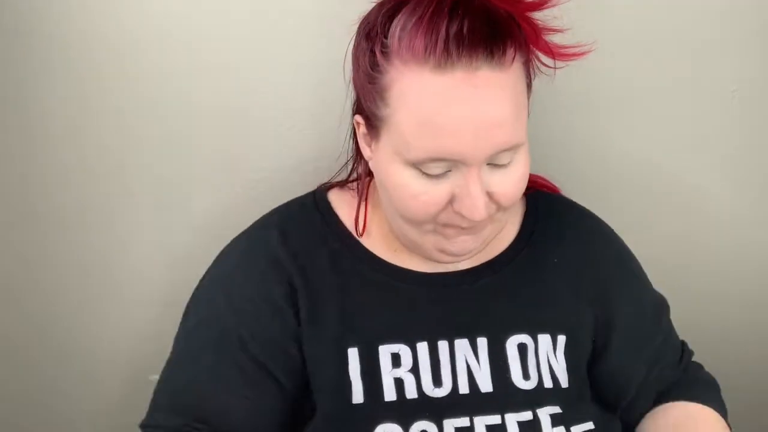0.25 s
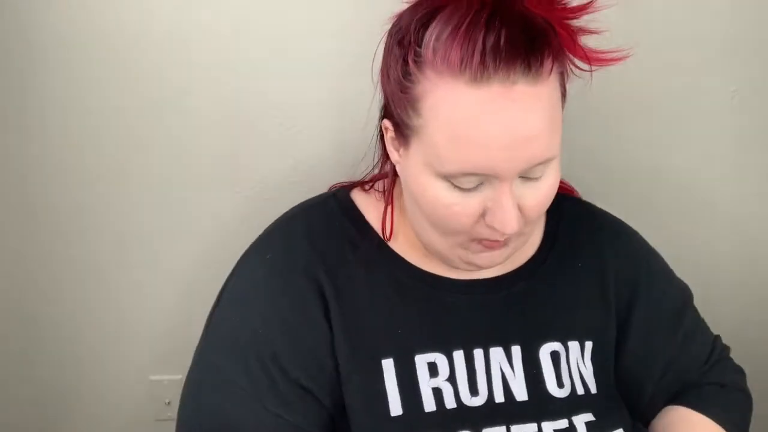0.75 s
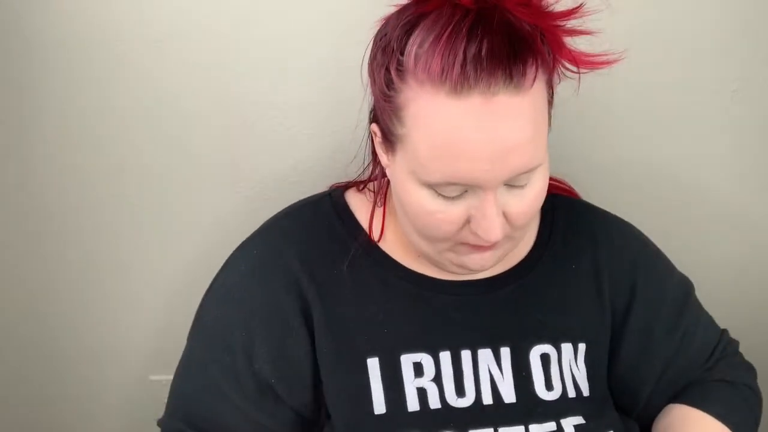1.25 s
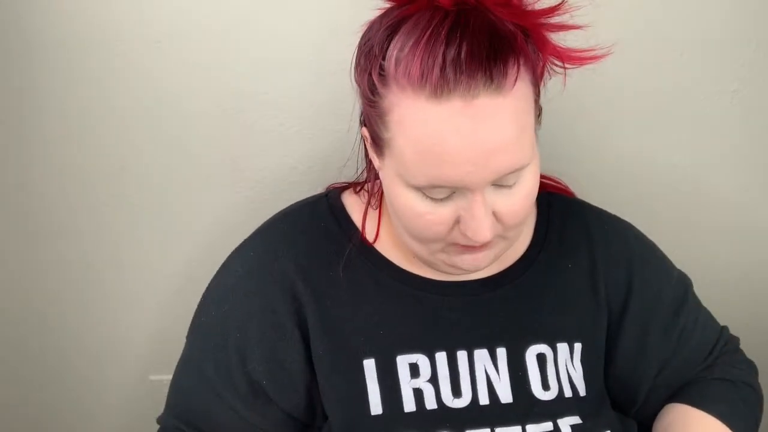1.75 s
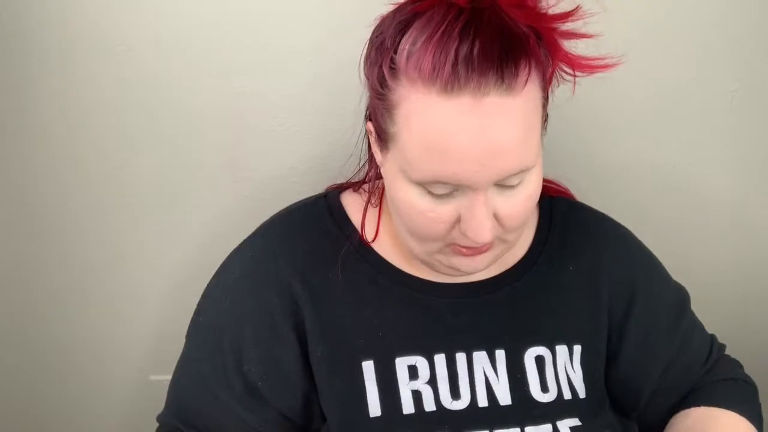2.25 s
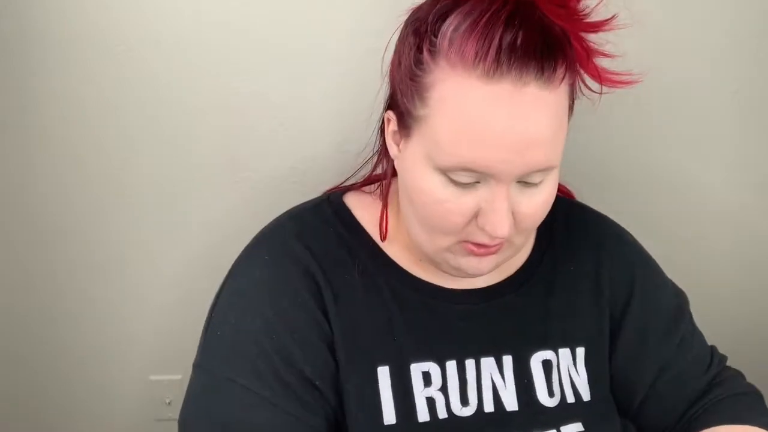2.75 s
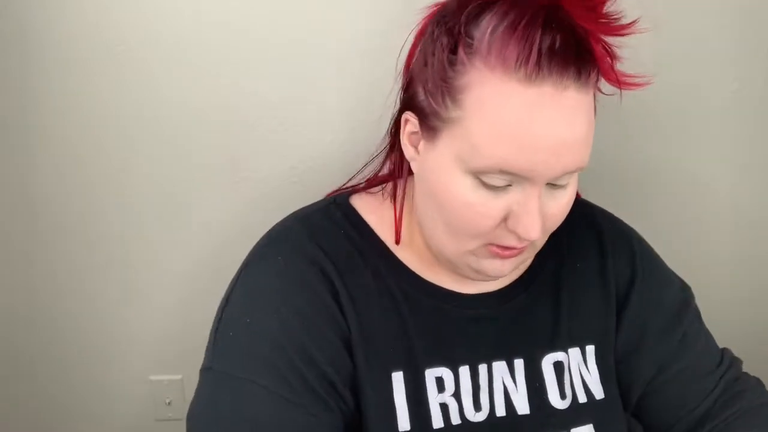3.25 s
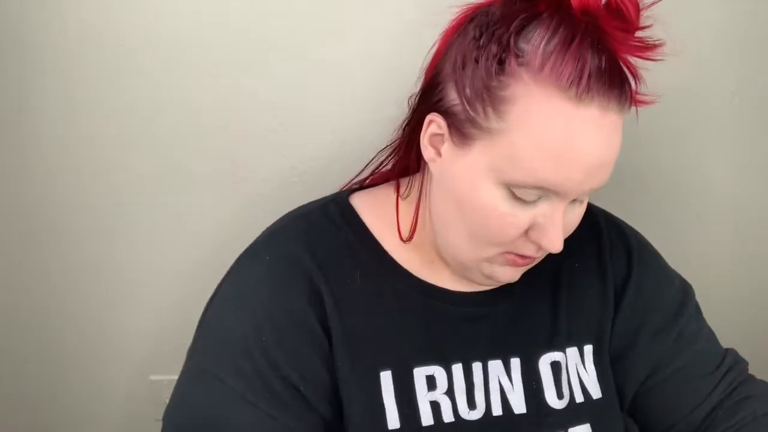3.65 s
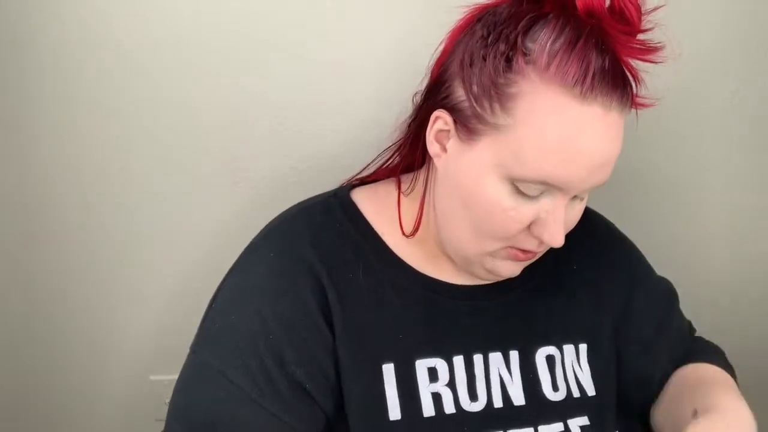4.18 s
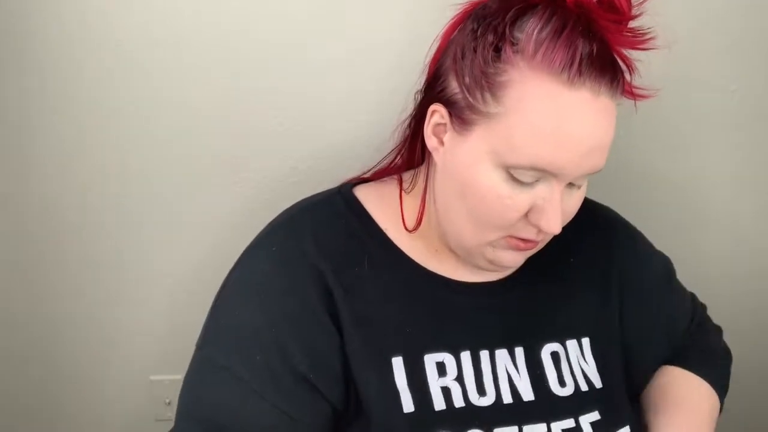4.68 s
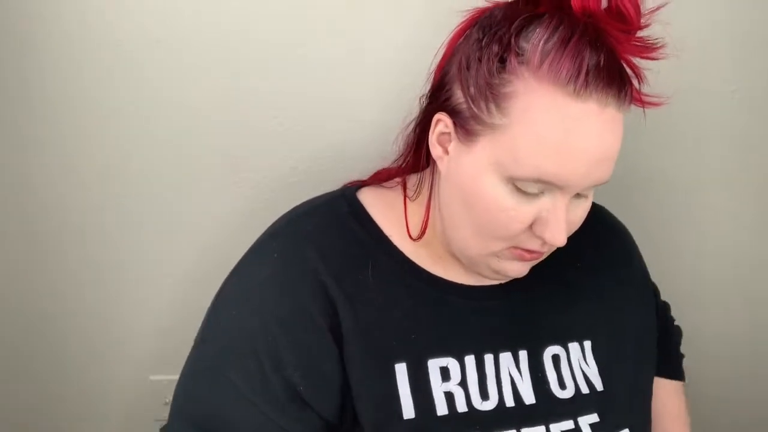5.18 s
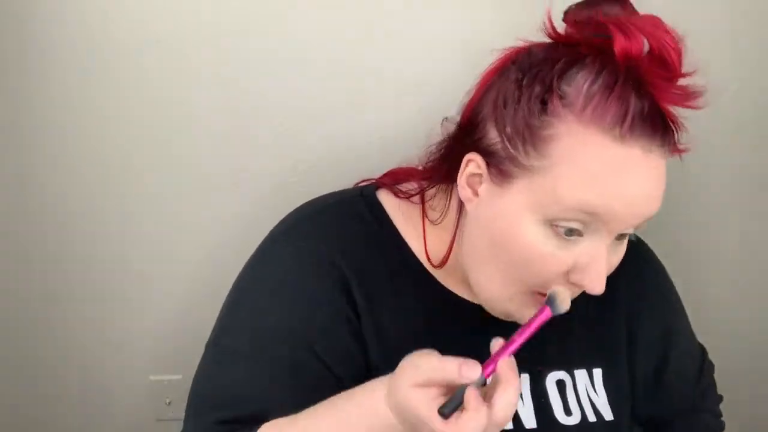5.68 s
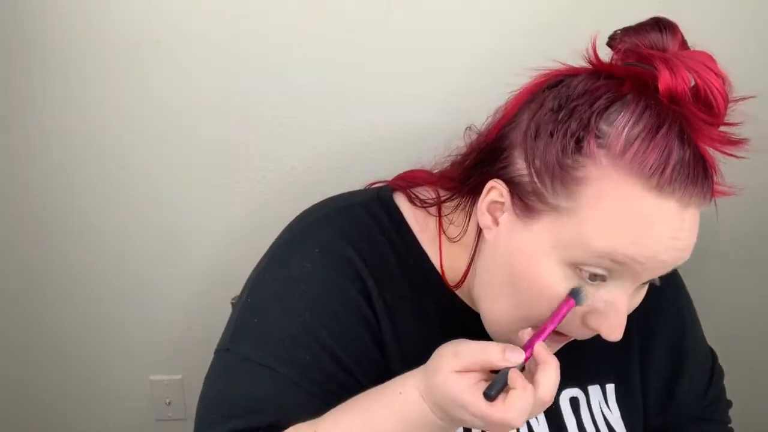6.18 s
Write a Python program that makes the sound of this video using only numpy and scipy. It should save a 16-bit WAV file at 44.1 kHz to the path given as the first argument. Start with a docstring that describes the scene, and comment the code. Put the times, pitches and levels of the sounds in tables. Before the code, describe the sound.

Hard plastic cases are snapped and set down with hollow knocks on a tabletop, followed by a short slide and a sleeve's faint swish.

```python
"""A low room rush and the soft brush of a hand come first; then small plastic makeup containers are
picked up, snapped and set down on a table in a bare, boomy room, and one case slides.
Each contact bends the table top, rattles the hollow case and clicks at its rim; the room rings on.
Then a sleeve brushes past and clothes rustle: noise shaped in colour and loudness, like all the rubbing.
The room rush is steady deep noise, a slowly settling middle part and a faint hiss."""
import sys
import numpy as np
from scipy import signal
from scipy.fft import rfft, irfft, next_fast_len
from scipy.io import wavfile
from scipy.ndimage import uniform_filter1d, map_coordinates

SR = 44100
rng = np.random.default_rng(int(sys.argv[2]) if len(sys.argv) > 2 else 0)


def int16_out(signal):
    """Quantize to a 16-bit WAV file."""
    q = np.round(np.clip(np.atleast_2d(signal).T, -1, 1) * 32767)
    wavfile.write(sys.argv[1], SR, q.astype(np.int16))


N = 283473

# Levels in the tables are those before the path, room and microphone gains.
# Cases meeting the table: t/s, case, table knock level/dB, knock f/Hz, cycles for a 60 dB decay,
# case clack level/dB, rim click level/dB, brightness/(dB per octave), spot (0 middle .. 1 right edge),
# room answer level/dB
TABLE_CONTACTS = [(.442, "compact", -36, 322, 3.9, -38, -54, 2, .08, 2.5),
                  (.459, "compact", -40, 248, 9.6, -41.5, -49, -4, 0.5, 3),
                  (.469, "compact", -32.5, 320, 3.9, -46, -52.5, 3.5, 0.062, 3),
                  (.517, "compact", -32.5, 335, 6, -40.5, -44.5, -3, 0.38, 3),
                  (.6208, "compact", -26.5, 332, 3.2, -21.5, -17, 4, 0.2, -3.5),
                  (.807, "compact", -25, 324, 4.9, -42, -53, -9.5, 0.17, -1.5),
                  (1.588, "jar", -15, 331, 4.6, -32.5, -45, -9, 0.2, -1.5),
                  (1.7328, "jar", -12.5, 337, 2.6, -19, -32, -6.5, 0.07, -2),
                  (1.7501, "jar", -25.5, 255, 3.5, -32, -32, -1.5, 0.83, 0),
                  (1.771, "jar", -44, 300, 4.3, -32, -47, -7, 0.7, -3.5),
                  (1.9217, "jar", -27, 350, 4.4, -32.5, -53.5, -0.5, 0.45, -2.5),
                  (2.7715, "palette", -50.5, 318.7, 5.6, -53, -61, -3, .42, -2.5),
                  (2.788, "palette", -40, 143.7, 6.7, -65, -89, 8, 0.11, -2),
                  (3.1241, "palette", -27.5, 447, 1.7, -32, -54, -16.5, 0.76, -2.5),
                  (3.245, "palette", -42.5, 300, 1.8, -33.5, -58, -2.5, .05, -1.5),
                  (3.43, "palette", -36.5, 368, 4, -45.5, -63, -8, 0.94, -1.5),
                  (3.621, "tube", -51.5, 451, 6.2, -57.5, -76.5, -7, 1, -4),
                  (3.6898, "tube", -24, 480, 3.7, -23.5, -42.5, 1.5, 0.84, -1.5),
                  (3.801, "tube", -30, 531, 3, -31.5, -54.5, -7.5, .75, -2)]
# Light plastic ticks and rattling lids, clear of the table:
# t/s, case, rim click level/dB, brightness/(dB per octave), 60 dB decay of the skid/s
LIGHT_TICKS = [(0.509, "compact", -38, -5, 0.0057), (.63, "compact", -32, -3, .006),
               (1.7345, "jar", -35, 2, 0.014), (1.741, "jar", -36.5, -6, 0.0052),
               (2.041, "jar", -71.5, 9, .006), (2.858, "palette", -61, 8, .006),
               (3.032, "palette", -68, 2, .006), (3.087, "palette", -57.5, 2.5, 0.0073),
               (3.156, "palette", -57, 2, .004), (3.204, "palette", -46, 3, 0.0063),
               (3.233, "palette", -42, 7, 0.022), (3.242, "palette", -40.5, 8.5, 0.024),
               (3.252, "palette", -47, 3, .008), (3.281, "palette", -53, -1, .012),
               (3.51, "palette", -69.5, 15, .012)]
# Resonances and hollows of each plastic shell, by case: f/Hz, width/Hz, level/dB
SHELL_RESONANCES = { "compact": [(913, 55, 4), (1025, 70, 6), (1350, 170, 7.5), (1610, 140, 6),
                    (2260, 130, 3.5), (2860, 87, 5.5), (3400, 420, 3), (5200, 400, 6), (5800, 500, 7),
                    (7100, 260, 3), (8550, 600, 4.5), (10000, 780, 7.5), (12700, 500, 4), (14800, 500, 4)],
                    "jar": [(702, 33, 5.5), (910, 67, 8), (1080.6, 40, 6), (1196, 100, 7), (1358, 77, 4),
                    (1600, 77, 5), (2170, 60, 9.5), (2480, 200, -1.5), (2760, 240, 5.5), (3120, 100, 4),
                    (3760, 120, 3), (5680, 400, 5.5), (6750, 350, 0.5), (8170, 630, 3.5), (12900, 750, 2)],
                    "palette": [(353, 81, 7), (540, 120, 5.5), (687, 62, 4), (1055, 44, 7.5), (1157, 41, 9),
                    (1460, 44, 5.5), (1970, 221.5, 0.5), (5820, 650, 7), (7650, 320, 2.5), (8200, 300, 3.5),
                    (10200, 760, 8.5), (14000, 2300, -1)], "tube": [(358, 64, 12.5), (436.6, 82, -12),
                    (526, 59, 6.5), (697, 71, 11), (853, 41, 4.5), (1096, 50, 7.5), (1360, 130, 7),
                    (1606, 170, 3), (1820, 100, -3), (2035, 110, 7.5), (2586, 92, 11), (3310, 480, 8),
                    (3950, 410, 1.5), (5203, 700, 6.5), (6740, 590, -11), (8700, 1100, 2)]}
# Colour of the hollow case's clack: f/Hz, level/dB
CASE_COLOUR = [(200, -29.5), (450, -10.5), (700, 6.5), (950, 5), (1300, 3), (1800, -1), (2600, -20),
               (4000, -19.5), (8000, -47.5), (16000, -76.5)]
# Colour of the rim's click: f/Hz, level/dB
RIM_COLOUR = [(500, -33), (1500, -6.5), (2000, 0.5), (2800, 2.5), (4400, 0.5), (5300, 1), (6500, 1),
              (8700, 5), (11000, -8.5), (13000, -7.5), (16000, -15.5)]
# A case slides in two pushes: t/s, length/s, level/dB
SLIDE_PUSHES = [(3.1, 0.17, -45.5), (3.21, 0.12, -47.5)]
# Colour of the sliding scrape: f/Hz, level/dB
SCRAPE_COLOUR = [(100, -13), (200, -11), (340, 3), (450, 3.5), (700, -6.5), (1200, -10), (2100, -19.5),
                 (4400, -31), (6000, -29), (8000, -36), (11000, -33), (15500, -29)]
# The rim digs in as the case tips: t/s, length/s, level/dB
RIM_RASPS = [(3.11, 0.13, -67), (3.175, 0.16, -58)]
# A sleeve brushes past, snags and brushes back: t/s, pull level/dB
SLEEVE_PULL = [(4.33, -98), (4.388, -91), (4.415, -73.5), (4.554, -63), (4.566, -59), (4.582, -61.5),
               (4.63, -67), (4.71, -65.5), (4.78, -68.5), (4.862, -83), (4.885, -73.5), (4.908, -70),
               (4.976, -88.5), (5.168, -85.5), (5.26, -102), (5.354, -82), (5.367, -74), (5.49, -67.5),
               (5.672, -71.5), (5.82, -88), (5.85, -91.5)]
# Colour of the sleeve's hiss: f/Hz, level/dB
SLEEVE_COLOUR = [(800, 0), (1600, 4.5), (2200, -4), (2700, -2.5), (3600, -2), (5000, -0.5), (7000, -3.5),
                 (9000, 1.5), (11500, -3.5), (13000, -1.5), (15000, -0.5), (16000, -7.5)]
# Fingers on a case: t/s, length/s, level/dB
FINGER_STROKES = [(2.575, 0.26, -68.5), (2.83, 0.34, -76), (3.625, 0.073, -69)]
# Colour of the fingers' rubbing: f/Hz, level/dB
FINGER_COLOUR = [(600, -22), (1500, 15), (2600, 7.5), (3400, -14), (9000, -27), (15000, -24)]
# A fingertip skids off smooth plastic: t/s, length/s, level/dB
FINGER_SKIDS = [(2.008, .055, -72), (3.025, .055, -73), (3.505, .035, -69.5)]
# Colour of the fingertip's skid: f/Hz, level/dB
SKID_COLOUR = [(2000, -15), (6000, -8), (8400, 3), (11000, -8), (14500, 0.5)]
# A hand brushes over the table: t/s, length/s, level/dB
HAND_STROKES = [(.16, 0.37, -67), (3.0, 0.26, -63), (3.62, 0.2, -61)]
# Colour of the hand's brush: f/Hz, level/dB
HAND_COLOUR = [(1500, 1.5), (2800, -11.5), (3500, -10.5), (4400, -5.5), (5600, -17), (14000, -25)]
# Dull rustle of leaning forward: t/s, length/s, level/dB
LEAN_STROKES = [(5.08, 0.095, -59), (5.55, 0.32, -56.5), (5.92, 0.6, -53.5)]
# Colour of the thick cloth: f/Hz, level/dB
THICK_CLOTH_COLOUR = [(40, -5.5), (80, 3), (140, 4.5), (260, -14.5), (370, -1), (600, -20), (1200, -47.5),
                      (4000, -68.5)]
# Time the room's tail takes to fall by 60 dB: f/Hz, decay/s
ROOM_DECAY = [(150, 0.93), (500, 0.25), (1200, 0.41), (1900, 0.36), (3000, .39), (4500, 0.36), (9000, 0.3),
              (15000, 0.13)]
# Colour of the room's answer: f/Hz, level/dB
WALL_COLOUR = [(60, -33.5), (130, -2.5), (250, -13.5), (370, -11.5), (520, 0.5), (1000, 0), (3000, 3.5),
               (9000, -10), (15000, -6.5)]
# How alike the two microphones hear a spread-out sound: f/Hz, likeness (1 same, 0 unrelated)
LEFT_RIGHT_LIKENESS = [(150, 0.97), (300, 0.94), (600, .35), (1200, .25), (2200, -.2), (4000, 0.13),
                       (9000, 0.1), (14000, -0.2)]
# The room's lowest standing waves: f/Hz, level/dB, 60 dB decay/s
STANDING_WAVES = [(135, 3.5, 0.26), (182, 1.5, 0.33)]
# What table and room keep ringing with: f/Hz, level/dB, 60 dB decay/s
ROOM_RINGS = [(205, -7.5, 0.76), (270, -16, 0.11), (325.5, -2, 0.21), (400, -16.5, 0.43), (506, 0, 0.32),
              (486, -10.5, 0.35), (710, -7.5, 0.53), (928, -2, 0.25), (1017, -9.5, 0.17), (1165, -8, 0.23),
              (1357, -3.5, 0.12), (1502, -6, 0.43), (1700, -11, 0.35)]
# Colour of the room rush: f/Hz, level/dB
AIR_COLOUR = [(12, -33), (20, -3.5), (33, -1), (46, 4), (60, -1), (92, -4.5), (122, -3.5), (213, -7.5),
              (259, -4), (298, -14), (362, -12.5), (505, -16.5), (881, -13.5), (1870, -39.5), (3350, -44),
              (4310, -47.5), (15500, -50)]
# Bumps in the rush: f/Hz, width/Hz, level/dB
AIR_BUMPS = [(121.4, 4.8, 8.5), (259, 25, 5), (357.5, 21, 11.5), (874.3, 23, 9)]
# The two microphones differ: f/Hz, left minus right level/dB
MICROPHONE_BALANCE = [(300, 0.5), (700, -2.5), (2000, -1.5), (4500, -0.5), (8000, 2.5), (13000, -0.5)]

BOOM_DB, EDGE_LOSS_DB = -7.5, 22  # boom against a blow in the middle; what the stiff table edge takes off
MIDDLE_RIGHT, EDGE_RIGHT = .15, 0.99  # direction of table middle and edge, right of centre 0..1
TICK_CLACK_DB, TICK_RIGHT = -4.5, .7  # a tick's clack against its click; its direction
SETTLE_S, SETTLE_LOSS_DB = .0028, 5.5  # mean time between rocking touches; loss from one to the next
CHATTER_ALIKE = .55  # share of a rim's skid that both microphones hear alike
CATCHES_PER_S, CATCH_SPREAD_DB = 650, 5  # the rim's tiny catches and their scatter in size
SLEEVE_DB, SNAG_DB = 3, 1  # whole hiss against its pull level; extra treble at the hardest pull
RUSH_START_DB, RUSH_REST_DB, RUSH_SETTLE_S = -47, -58, 2.4  # the rush starts louder and settles
TOP_HZ = 15900  # upper band limit


def containers():
    """Table contacts knock, clack, click and boom, less boom near the edge; ticks only clack and click."""
    out = np.zeros((2, N + SR))
    t = np.arange(SR * 3 // 5) / SR
    for (start, case, knock_db, knock_hz, cycles, clack_db, click_db,
         bright_db, spot, room_db) in TABLE_CONTACTS:
        bend = amp(knock_db) * knock(knock_hz, cycles, case)
        clack = amp(clack_db) * settling(ringing(CASE_COLOUR, case, bright_db))
        click = amp(click_db) * ringing(RIM_COLOUR, case, bright_db)
        force = amp(knock_db) + amp(clack_db)
        boom = force * amp(BOOM_DB - EDGE_LOSS_DB * spot) * modes(t, STANDING_WAVES, attack=0.011)
        right = MIDDLE_RIGHT + (EDGE_RIGHT - MIDDLE_RIGHT) * spot
        hit = contact(t, bend + clack, click, right, room_db, skid_s=.0055)
        out[:, round(start * SR):][:, :len(t)] += hit + boom
    t = t[:SR // 4]
    for start, case, click_db, bright_db, skid_s in LIGHT_TICKS:
        clack = amp(click_db + TICK_CLACK_DB) * ringing(CASE_COLOUR, case, bright_db)
        click = amp(click_db) * ringing(RIM_COLOUR, case, bright_db)
        hit = contact(t, clack, click, TICK_RIGHT, room_db=-1.5, skid_s=skid_s)
        out[:, round(start * SR):][:, :len(t)] += hit
    return out[:, :N]


def contact(t, body, click, right, room_db, skid_s):
    """A body sound and a rim click reach the microphones straight and by way of the room."""
    def through(x, path):
        return signal.fftconvolve(x[None], path, axes=1)[:, :len(t)]

    body = dispersed(body, travel=0.001111)
    answer = amp(room_db) * room(t, tail_db=-33.0, early_db=2.5, early_t60=0.18, rings_db=-54.5)
    rim_path = answer + amp(-8.0) * chatter(t, skid_s, right)
    hit = through(body, answer) + through(click, rim_path)
    hit[:, :len(body)] += amp(-4.5) * from_side(body, right)
    return hit


def knock(hz, cycles, case, size=4096):
    """A heavily damped bend of the table top, weak in deep bass; the case on it resonates along."""
    t = np.arange(size) / SR
    swell = 1 - np.exp(-t / 0.0035)
    bend = np.sin(2 * np.pi * hz * t) * amp(-60 * t * hz / cycles) * swell
    shell = causal(bumps(SHELL_RESONANCES[case], np.fft.rfftfreq(size, 1 / SR)))
    bend = signal.fftconvolve(bend, shell)[:size]
    return burst(signal.lfilter(*signal.butter(2, 150, "high", fs=SR), bend))


def ringing(spectrum, case, tilt_db, size=4096):
    """A struck plastic shell: each contact has its own brightness and favours its own fine resonances."""
    hz = np.fft.rfftfreq(size, 1 / SR)
    octaves = np.log2(1 + hz / 1000)
    ripple = unit(uniform_filter1d(rng.standard_normal(len(hz)), size=6))
    ripple_db = 2.2 * ripple * hz / (hz + 1000)  # grows towards the treble
    shell_db = bumps(SHELL_RESONANCES[case], hz)
    return burst(causal(along(spectrum, hz) + shell_db + ripple_db + tilt_db * octaves))


def settling(x, count=3):
    """A case never lands flat: weaker touches follow within milliseconds and make the clack clatter."""
    gaps, sizes = rng.uniform(.5, 1.5, (2, count))
    times = np.round(np.cumsum(gaps) * SETTLE_S * SR).astype(int)
    touches = np.zeros(len(x))
    touches[0] = 1
    touches[times] = sizes * amp(-SETTLE_LOSS_DB * np.arange(1, count + 1))
    return burst(signal.fftconvolve(x, touches)[:len(x)])


def chatter(t, t60, right):
    """A rim skids for a few milliseconds before it seats; the microphones hear it only partly alike."""
    shape = amp(-60 * t / t60) * (1 - np.exp(-t / 0.00053)) ** 2
    slips = rng.standard_normal((3, len(t))) * shape
    shared = np.sqrt(CHATTER_ALIKE) * from_side(slips[0], right)
    force = shared + np.sqrt(1 - CHATTER_ALIKE) * slips[1:]
    return force / np.sqrt(np.mean(np.sum(force ** 2, axis=1)))


def slide():
    """The palette scrapes: its body judders, its rim catches in tiny clicks, and both ring in the room."""
    slips = rubbing(SLIDE_PUSHES, SCRAPE_COLOUR, ease=0.31, uneven_db=2.8, grain_db=3.0, grain_rate=700)
    body = filtered(slips, lambda hz: 1 / (1 + (hz / 2000) ** 4))
    judder = unit(amp(4 * wobble(170)))
    sizes = amp(CATCH_SPREAD_DB * rng.standard_normal((2, N)))
    catches = (rng.random(N) < CATCHES_PER_S / SR) * sizes
    clicks = filtered(catches, lambda hz: amp(along(RIM_COLOUR, hz)))
    rasp = stroke(RIM_RASPS, ease=0.39) * unit(clicks)
    force = slips + body * (judder - 1) + rasp  # only the body part judders
    scrape = filtered(force, lambda hz: amp(bumps(SHELL_RESONANCES["palette"], hz)))
    answer = room(np.arange(SR // 2) / SR, tail_db=-32.5, early_db=-3, early_t60=0.14, rings_db=-60.5)
    return amp(-3.5) * scrape + signal.fftconvolve(scrape, answer, axes=1)[:, :N]


def sleeve():
    """Fibres slip and flutter; the harder the cloth pulls, the brighter the hiss."""
    times, level_db = np.transpose(SLEEVE_PULL)
    pull = amp(np.interp(np.arange(N) / SR, times, level_db, left=-120, right=-120))
    slips = rng.standard_normal((2, N)) * amp(1.8 * wobble(900))
    hiss = unit(diffuse(slips, SLEEVE_COLOUR))
    treble = filtered(hiss, lambda hz: 1 - 1 / (1 + (hz / 6500) ** 4))
    flutter = amp(1.1 * wobble(30) + 1.1 * wobble(130))
    brighter = hiss + amp(SNAG_DB) * pull / pull.max() * treble
    return amp(SLEEVE_DB) * pull * flutter * brighter


def rubbing(rows, spectrum, ease, uneven_db, grain_db, grain_rate):
    """Friction: countless tiny slips, clumped in time, under the uneven pressure of a stroke."""
    slips = rng.standard_normal((2, N)) * amp(grain_db * wobble(grain_rate))
    pressure = stroke(rows, ease) * amp(uneven_db * wobble(30.32))
    return pressure * unit(diffuse(slips, spectrum))


def stroke(rows, ease):
    """Loudness of movements that each speed up and slow down over the share ease of their length."""
    t, gain = np.arange(N) / SR, np.zeros(N)
    for start, length, db in rows:
        to_end = np.minimum(t - start, start + length - t) / length  # distance to the nearer end
        gain += amp(db) * np.sin(np.pi / 2 * np.clip(to_end / ease, 0, 1)) ** 2
    return gain


def room(t, tail_db, early_db, early_t60, rings_db):
    """Close walls answer within milliseconds, then a diffuse tail and a few resonances ring on."""
    hz, frames, bands = signal.stft(rng.standard_normal((2, len(t))), SR, nperseg=256)
    fading = bands * amp(-60 * frames / along(ROOM_DECAY, hz)[:, None])  # each band at its own pace
    tail = signal.istft(fading, SR, nperseg=256)[1][:, :len(t)]
    early = rng.standard_normal((2, len(t))) * amp(early_db - 60 * t / early_t60)
    arrival = 1 - np.exp(-(t / 0.0051) ** 2)
    walls = diffuse(tail + early, WALL_COLOUR) * amp(tail_db) * arrival
    return walls + amp(rings_db) * modes(t, ROOM_RINGS, attack=0.0016)


def modes(t, table, attack):
    """Decaying resonances that build up smoothly, struck a little differently each time."""
    ring = np.zeros(len(t))
    for hz, db, t60 in table:
        fade = amp(db + rng.normal(0, 1) - 60 * t / t60)
        ring += fade * np.sin(2 * np.pi * (hz * t + rng.random()))
    return ring * (1 - np.exp(-t / attack)) ** 2


def air():
    """The room's steady deep rumble, a slowly settling rush above it and a faint even hiss."""
    noise = diffuse(rng.standard_normal((2, N)), AIR_COLOUR)
    noise = unit(filtered(noise, lambda hz: amp(bumps(AIR_BUMPS, hz))))
    deep = filtered(noise, lambda hz: 1 / (1 + (hz / 90) ** 4))
    low = filtered(noise, lambda hz: 1 / (1 + (hz / 1300) ** 4))
    settle = np.exp(-(np.arange(N) / SR / RUSH_SETTLE_S) ** 2)
    rush_db = RUSH_REST_DB + (RUSH_START_DB - RUSH_REST_DB) * settle
    rush = (low - deep) * amp(rush_db + 1.0 * wobble(9.9))
    return amp(-51.5) * deep + rush + amp(-54.0) * (noise - low)


def diffuse(pair, spectrum):
    """Two unrelated noises become a coloured sound field: alike in the bass, nearly unrelated higher up."""
    def mix(hz):
        turn = np.arccos(np.clip(along(LEFT_RIGHT_LIKENESS, hz), -.99, .995)) / 2
        return amp(along(spectrum, hz)) * [np.cos(turn), np.sin(turn)]

    mid, side = filtered(pair, mix)
    return np.array([mid + side, mid - side])


def dispersed(x, travel):
    """Bending waves: high frequencies arrive first; travel is the delay in s at 1 kHz."""
    return filtered(x, lambda hz: np.exp(-4j * np.pi * travel * np.sqrt(1000 * hz)))


def from_side(x, right):
    """A sound from the right reaches the right microphone sooner and stronger."""
    ears = right * np.array([[-1], [1]])
    return amp(1.2 * ears) * filtered(x, lambda hz: np.exp(2j * np.pi * hz * ears * 4.5e-5))


def filtered(x, response):
    """Multiply the spectrum of x by a response of frequency."""
    n = x.shape[-1]
    padded = next_fast_len(n + SR // 8)
    return irfft(rfft(x, padded) * response(np.fft.rfftfreq(padded, 1 / SR)), padded)[..., :n]


def causal(gain_db):
    """The promptest impulse response (minimum phase) that has this gain over frequency."""
    cepstrum = irfft(np.log(amp(gain_db)))
    half = len(cepstrum) // 2
    cepstrum[1:half] *= 2
    cepstrum[half + 1:] = 0
    return irfft(np.exp(rfft(cepstrum)))


def bumps(peaks, hz):
    """Lift in dB from resonances given as (f/Hz, width/Hz, level/dB)."""
    return sum(db / (1 + (2 * (hz - centre) / width) ** 2) for centre, width, db in peaks)


def along(points, hz):
    """Read a curve of (f/Hz, value) points on a log frequency axis."""
    f, values = np.transpose(points)
    return np.interp(np.log(hz + 1), np.log(f + 1), values)


def wobble(rate):
    """A smooth random curve through rate random points a second."""
    points = rng.standard_normal(int(N * rate / SR) + 4)
    return map_coordinates(points, [np.arange(N) * rate / SR])


def burst(x):
    """Scale a short sound so that its energy equals rms 1 over 10 ms."""
    return x / np.sqrt(np.mean(np.sum(x ** 2, axis=-1)) / (SR * .01) + 1e-20)


def unit(x):
    """Scale to rms 1."""
    return x / np.sqrt(np.mean(x ** 2) + 1e-20)


def amp(db):
    """Turn dB into an amplitude factor."""
    return 10 ** (np.asarray(db) / 20)


def scene():
    """Contacts, the rubbing of cases, fingers and clothes, and the room."""
    fingers = rubbing(FINGER_STROKES, FINGER_COLOUR, ease=0.023, uneven_db=0.5, grain_db=2.0, grain_rate=130)
    scuffs = rubbing(FINGER_SKIDS, SKID_COLOUR, ease=.35, uneven_db=1.1, grain_db=2.4, grain_rate=500)
    reach = rubbing(HAND_STROKES, HAND_COLOUR, ease=0.35, uneven_db=1.2, grain_db=0.5, grain_rate=150)
    lean = rubbing(LEAN_STROKES, THICK_CLOTH_COLOUR, ease=0.17, uneven_db=-0.5, grain_db=1.0, grain_rate=25)
    return containers() + slide() + sleeve() + fingers + scuffs + reach + lean + air()


def record(dry):
    """Two slightly unequal microphones with a steep cut at the upper band limit."""
    halves = np.array([[.5], [-.5]])  # left gets half the difference, right loses half
    heard = filtered(dry, lambda hz: amp(along(MICROPHONE_BALANCE, hz) * halves))
    return filtered(heard, lambda hz: 1 / np.sqrt(1 + (hz / TOP_HZ) ** 160))


dry = scene()
out = record(dry)
int16_out(out)
```